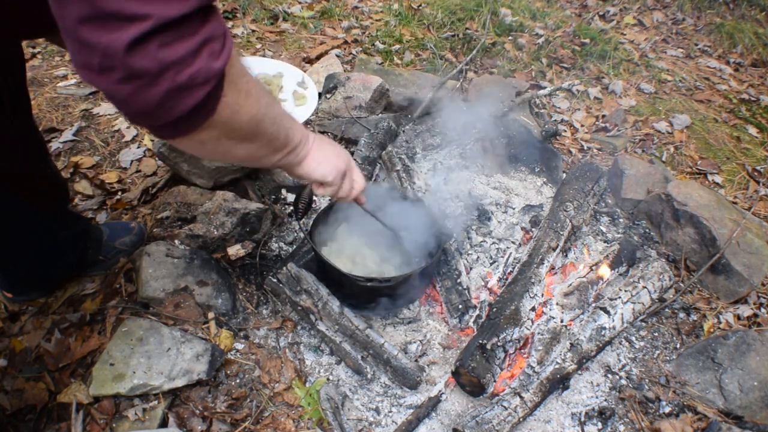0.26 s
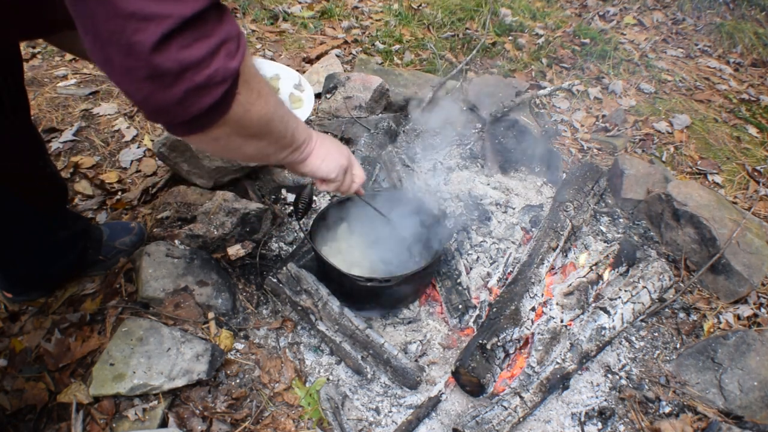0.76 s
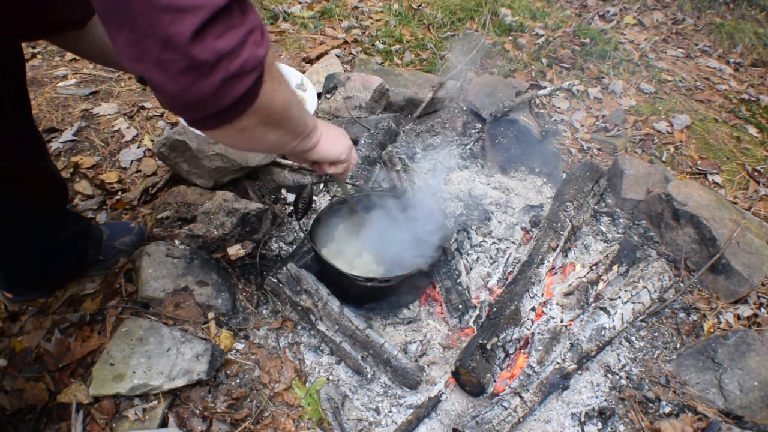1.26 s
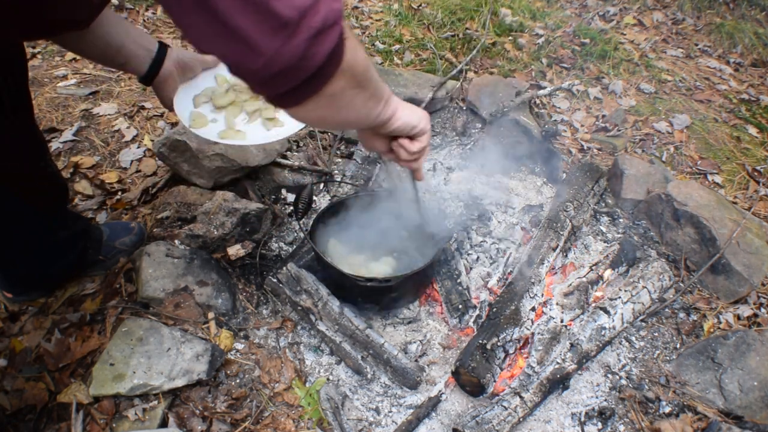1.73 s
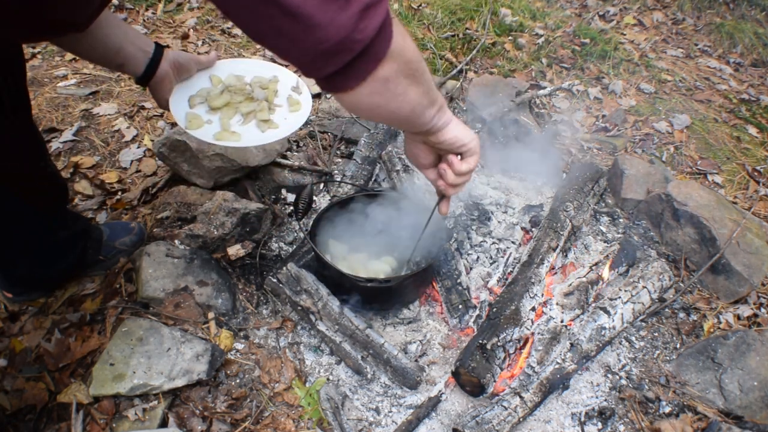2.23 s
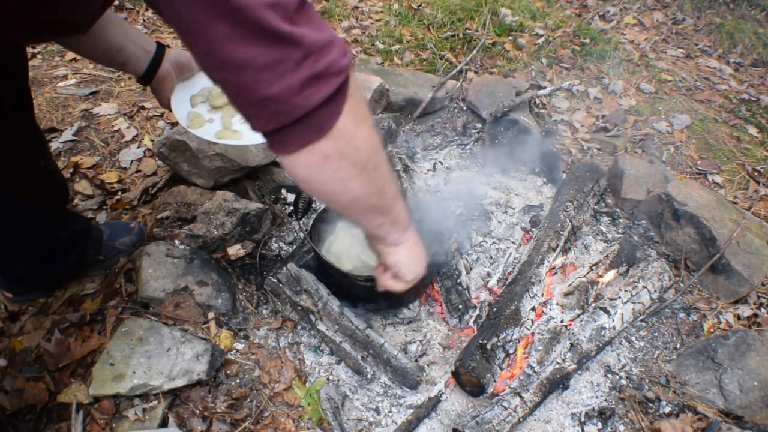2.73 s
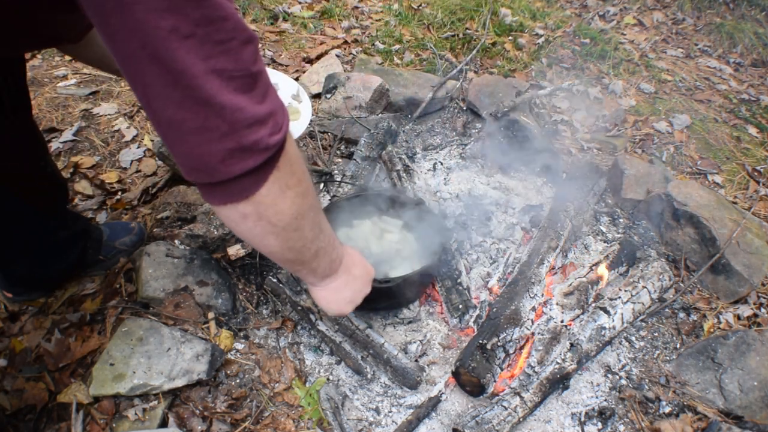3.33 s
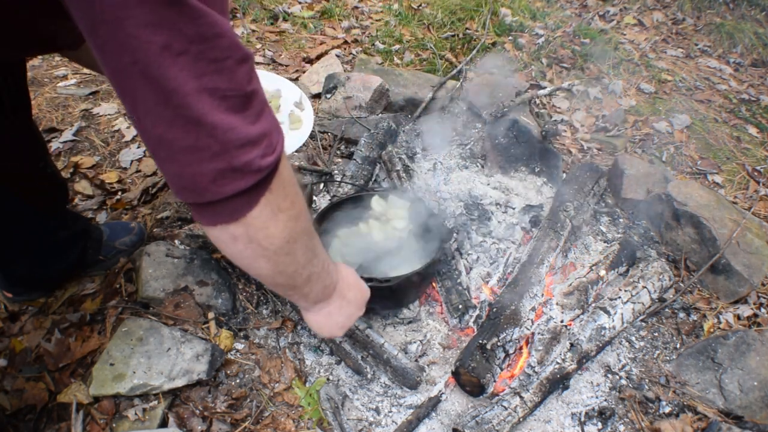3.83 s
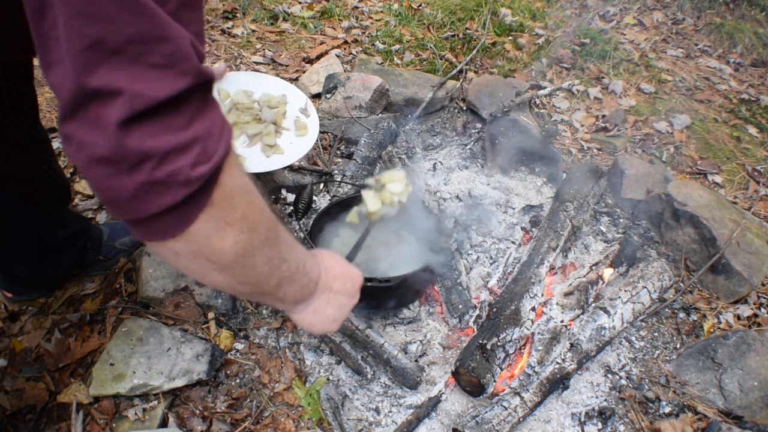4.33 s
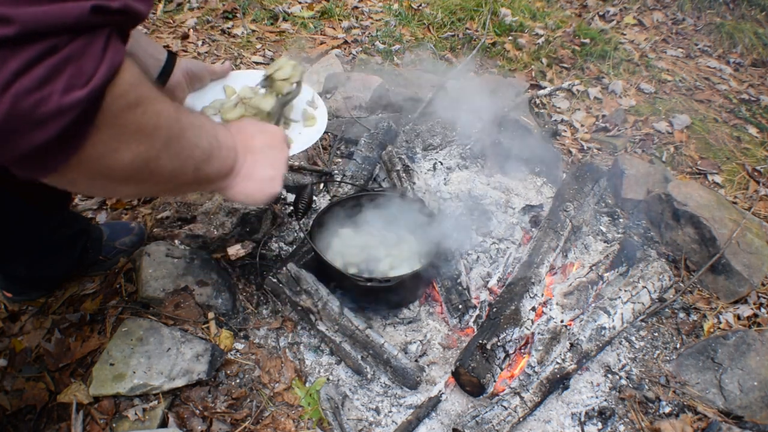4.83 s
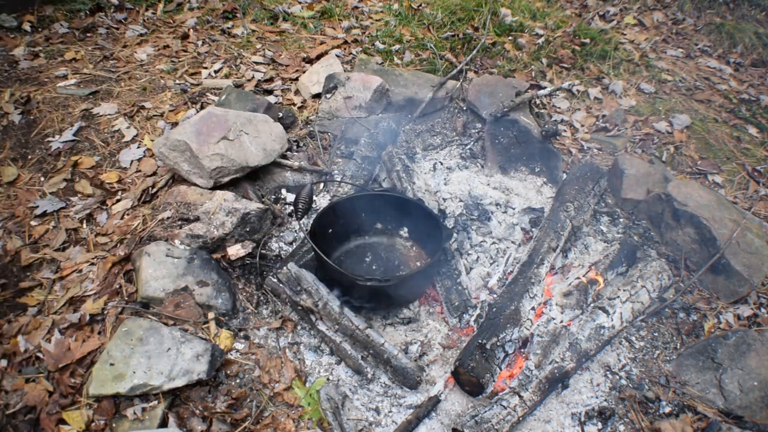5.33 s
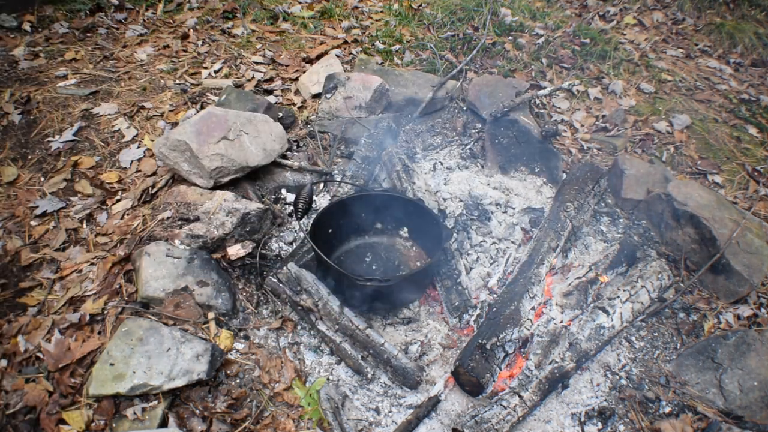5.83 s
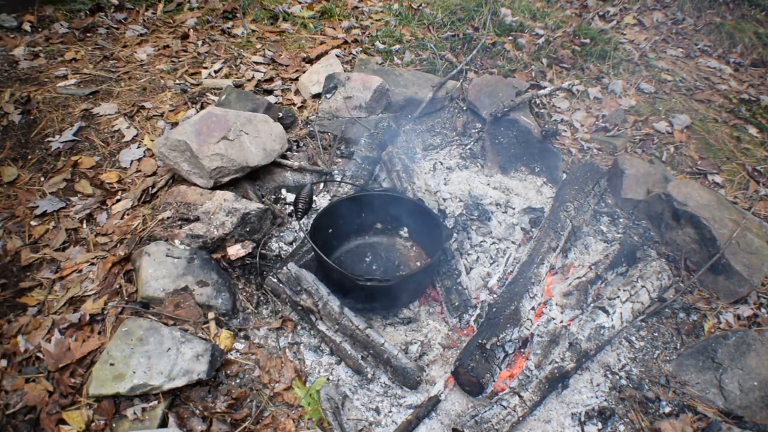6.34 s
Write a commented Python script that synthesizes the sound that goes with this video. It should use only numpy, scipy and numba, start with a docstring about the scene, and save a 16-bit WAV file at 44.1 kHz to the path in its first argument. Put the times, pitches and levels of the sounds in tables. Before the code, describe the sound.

Ringing scrapes and clanks in a cast-iron pot over soft frying sizzle and sharp oil pops, then suddenly quieter air, crunching leaves and a faint insect.

```python
"""Outdoors over coals, a metal spoon knocks and scrapes the floor of a cast-iron pot of sizzling, spitting oil.
Random slips and knocks excite the pot's modes; filtered noise and clicks make the oil, fire and distance.
A sine of gliding pitch is a far engine's drone. At 5.17 s the scene jumps ahead: the oil is silent,
the drone is higher, feet crunch over dry leaves as swelling clouds of filtered clicks, and an insect chirps."""
import sys
import numpy as np
from scipy import signal
from scipy.fft import rfft, irfft, next_fast_len
from scipy.io import wavfile
from scipy.ndimage import uniform_filter1d
from numba import njit

SR = 44100
rng = np.random.default_rng(int(sys.argv[2]) if len(sys.argv) > 2 else 0)


def put_to_file(sound):
    """Save the sound as 16-bit audio at rate SR, in the file named by the first command-line argument."""
    columns = np.atleast_2d(sound).T  # one column per channel
    safe = np.clip(columns, -1, 1)
    whole_steps = np.round(safe * 32767)
    wavfile.write(sys.argv[1], SR, whole_steps.astype(np.int16))


N = 290605
GRID_HZ = 2000  # swells are computed on this coarser time grid
SWELL_DB = 25  # rise and fall times span this many dB

# the spoon lands or catches: start_s, relative level_db, pitch_hz (favoured), place (of contact, 0-1), thud_db
KNOCKS = [(0.022, 3.5, 2367, 0.43, -53), (0.439, 3.5, 2050, 0.3, -41), (0.556, -7.5, 2680, 0.26, -53),
          (0.887, -6.5, 3500, 0.7, -18.5), (1.042, -10.5, 764, 0.26, -45), (1.264, 1, 3900, 0.05, -19),
          (1.312, -10, 3650, 0.23, -49), (1.48, -26, 3230, 0.4, -59), (1.8055, -9, 5350, 0.5, -48),
          (1.885, -8, 3370, 0.27, -43), (1.961, -13, 1355, 0.59, -40), (2, -4, 3150, 0.36, -70),
          (2.156, -15.5, 790, 0, -48), (2.17, -13, 2300, 0.3, -59), (2.909, -21, 1240, 0.99, -45)]
# pushes of the spoon over the iron; a landing skids at once, a drag swells: # top_s (when the level reaches its
# top), rise_s, hold_s, fall_s, level_db, pitch_hz (favoured), place (of contact, 0-1), #
# brightness_db_per_octave, then ring_db, rasp_db and scuff_db against the level, lift_db (at the favoured
# pitch)
SCRAPES = [ (0.027, 0.079, 0.011, 0.022, -8, 2380, 0.51, 0.5, -32.5, -17, -31, 4),
           (0.057, 0.059, 0.018, 0.081, -6, 2900, 0.044, 2, -30, -15, -43, 3),
           (0.103, 0.074, 0.031, 0.035, -13.5, 4600, 0.44, 7, -30.5, -8.5, -55, 8),
           (0.44, 0.0025, 0, 0.01, 2.5, 2020, .3, -4, -32.5, -37, -17, 3),
           (0.511, 0.034, 0.039, 0.04, -7.5, 1820, 0.26, -1.5, -29.5, -15, -40, 2.5),
           (0.887, 0.0011, 0.0032, 0.017, -0.5, 2120, 0.28, -1.5, -29, -13, -50, -0.5),
           (0.968, 0.062, 0.023, 0.071, -2.5, 1970, 0.25, -1.5, -31.5, -14, -49, 4.5),
           (1.031, 0.08, 0.0034, 0.044, -9, 1100, 0.33, 0, -31, -28, -40, 8),
           (1.266, 0.0037, 0, 0.029, -12, 3630, 0.82, 4, -31, 5.5, -43, 15.5),
           (1.328, 0.038, 0, 0.18, -15.5, 3670, 0.73, 0.5, -32.5, -17, -21, -4),
           (1.419, 0.082, .045, 0.035, -7.5, 3260, 0.27, -0.2, -32, -17.5, -28, 3.5),
           (1.805, .0015, 0, 0.036, -11.5, 5130, .59, 7.5, -34.5, 2.5, -24, 19),
           (1.848, 0.026, 0.042, 0.082, -16.5, 3270, 0.375, 1, -30.5, -10.5, -40, 17),
           (1.885, 0.055, 0.012, 0.042, -6, 3240, .45, 1, -31.5, -27, -23.5, -2.5),
           (1.959, 0.0025, 0.0051, 0.042, -14, 1500, 0.215, 0.5, -31, -22, -40, -11),
           (2.002, .05, 0.0079, 0.066, -4.5, 3100, 0.39, 0.5, -31.5, -20, -47, 1.5),
           (2.068, 0.16, 0.016, 0.071, -9.5, 1410, 0.26, -3, -32.5, -29, -30.5, 4),
           (2.161, 0.027, 0.033, 0.13, -9.5, 1486, .3, -3.5, -31.5, -26, -26, 4.5),
           (2.226, 0.045, 0.014, 0.078, -18, 2200, 0.33, -1, -33, -30, -39, 16),
           (2.31, 0.1, 0.0098, 0.16, -6, 2780, 0.28, -3, -33, -24, -31, 6.5),
           (2.377, 0.25, 0.028, 0.1, -11, 2050, 0.24, -2.5, -33.5, -18.5, -38, 1.5),
           (2.517, 0.11, 0.0063, 0.2, -11, 1900, 0.14, -0.7, -33, -21, -20.5, 7.5),
           (2.622, .1, 0.023, 0.11, -24.5, 1750, .3, -0.5, -32, -27, -14, 6),
           (2.69, .08, 0.098, 0.11, -11, 1870, 0.15, -0.2, -34.5, -16, -24.5, 10),
           (2.803, 0.067, 0.035, 0.12, -13, 1570, 0.2, 0.5, -32, -15, -32, 8),
           (2.88, .2, 0.039, 0.021, -21, 1290, 0.24, -3, -35.5, -37, -17, 21.5),
           (3.164, 0.19, .005, 0.14, -25.5, 1300, .23, -2.5, -34, -9, -17, 6), ]


def gain_of(db):
    """Level is logarithmic: 20 dB is a factor of ten in amplitude."""
    return 10 ** (np.asarray(db) / 20)


def evened(x):
    """Normalisation to unit rms gives sources of any kind equal power."""
    return x / np.sqrt(np.mean(x ** 2) + 1e-20)


def played(tables, column, rest):
    rows = []
    for table in tables:
        edge = [] if rest is None else [rest]
        rows += [(table[0][0] - 0.004, value) for value in edge]
        rows += [(row[0], row[column]) for row in table]
        rows += [(table[-1][0] + 0.0024, value) for value in edge]
    s, value = np.transpose(sorted(rows))
    return np.interp(np.arange(N) / SR, s, value)


def coloured(x, spectrum):
    """Spectral filtering: the Fourier components are weighted by a response in dB, then set to rms 1."""
    f, db = np.transpose(spectrum)
    size = next_fast_len(N)
    hz = np.fft.rfftfreq(size, 1 / SR)
    response = gain_of(np.interp(np.log(hz + 1), np.log(f), db, left=-90))
    return evened(irfft(rfft(x, size) * response)[:N])


def grit(per_s, spread_db):
    """Shot noise: random clicks of either sign, a few of them large, rms 1."""
    size = gain_of(spread_db * np.minimum(rng.exponential(1, N), 5))
    sign = rng.choice([-1., 1.], N)
    return evened(size * sign * (rng.random(N) < per_s / SR))


def flutter(per_s, depth_db):
    """Random amplitude modulation by smoothed noise, of rms depth depth_db."""
    span = max(round(SR / per_s), 2)
    smooth = uniform_filter1d(uniform_filter1d(rng.standard_normal(N), span), span)
    return gain_of(depth_db * evened(smooth))


def resonate(x, hz, width):
    """Heterodyne resonance: hz is shifted down to zero, smoothed and shifted back, at gain 1."""
    turn = np.exp(2j * np.pi * np.cumsum(hz * np.ones(len(x))) / SR)
    r = np.exp(-np.pi * width / SR)
    return 2 * (turn * signal.lfilter([1 - r], [1, -r], x / turn)).real


def burst(events, decay_s, width_share, flat_db):
    """Impact noise: a sudden start and exponential decay, rung around each event's centre frequency."""
    out, t = np.zeros(N + 2000), np.arange(1500) / SR
    for (s, db, hz), noise in zip(events, rng.standard_normal((len(events), 1500))):
        puff = noise * np.exp(-t / decay_s)
        rung = resonate(puff, hz, width_share * hz)
        sound = rung / abs(rung).max() + gain_of(flat_db) * puff / abs(puff).max()
        out[round(s * SR):][:1500] += gain_of(db) * sound
    return out[:N]


@njit
def ring(drive, hz, width, sr):
    """A damped mode is a decaying rotating phasor; its decay rate may change in time."""
    out, state, turn = np.zeros(len(drive)), 0j, np.exp(2j * np.pi * hz / sr)
    for n in range(len(drive)):
        state = state * turn * (1 - np.pi * width[n] / sr) + drive[n]
        out[n] = state.imag
    return out


def favour(hz, centre_hz, octaves, db):
    """Selective excitation: a bell-shaped lift over log frequency, in gain."""
    return gain_of(db * np.exp(-(np.log2(hz / centre_hz) / octaves) ** 2))


def swells(rows):
    """Exponential envelopes are straight in dB: each row rises, holds and falls, in dB below its top."""
    t = np.arange(0, N / SR, 1 / GRID_HZ)
    s, rise, hold, fall = np.transpose([row[:4] for row in rows])[:, :, None]
    before, after = np.maximum(s - t, 0), np.maximum(t - s - hold, 0)
    return -SWELL_DB * (before / rise + after / fall)


def fine(x):
    """Linear interpolation from the coarse grid to samples."""
    return np.interp(np.arange(N) / SR, np.arange(len(x)) / GRID_HZ, x)


def summed_db(shape_db, top_db):
    """Powers of incoherent sources add: the level of all swells together."""
    power = (gain_of(shape_db + np.c_[top_db]) ** 2).sum(0)
    return fine(10 * np.log10(power + 1e-10))


def leading(shape_db, top_db, value):
    """Power-weighted mean: the loudest swell dominates a value given per row."""
    db = shape_db + np.c_[top_db]
    share = gain_of(db - db.max(0)) ** 2
    return fine((share * np.c_[value]).sum(0) / share.sum(0))


def sizzle():
    """Bubble noise: dense tiny bubbles seethe as near-steady noise, larger ones crackle as sparse clicks."""
    # start_s, crackle_db, seethe_db
    levels = [(0, -43, -41.5), (.75, -49.5, -40.5), (1.7, -45.5, -44.5), (2.2, -38.5, -38), (3.0, -41, -33),
              (3.3, -46.5, -37), (3.6, -37, -38), (3.9, -44, -41.5), (4.07, -42, -39.5), (4.4, -41.5, -41),
              (4.9, -45, -43), (5.16, -44, -40.5)]
    # colour of the seethe: frequency_hz, relative level_db per Hz
    fizz = [(1060, -43), (1800, -44), (1910, -1.5), (2730, 2), (5500, 1), (7300, -10), (9000, -11),
            (14000, -13), (16500, -43)]
    seethe = rng.standard_normal(N) * flutter(40, 1.4) + 0.4 * grit(1500, 7.0)
    crackle = rng.standard_normal(N) + 1.4 * grit(2100, 4.8) + 0.7 * grit(80, 6.5)
    crackle = coloured(crackle, [(3000, 3), (7500, 0.5), (11000, 4), (16500, 0.5)])
    out = gain_of(played([levels], column=2, rest=-90)) * coloured(seethe, fizz)
    return out + gain_of(played([levels], column=1, rest=-90)) * crackle


def wash():
    """Broadband noise: fire and far traffic merge into a soft, nearly steady wash."""
    # frequency_hz, relative level_db per Hz
    air = [(15, -63), (25, -20), (65, -12), (245, -12.5), (470, -8.5), (600, -9.5), (706, -7), (1220, -7),
           (2150, -16), (3600, -16), (5130, -26), (14400, -33), (16500, -50)]
    return gain_of(-38) * coloured(rng.standard_normal(N), air) * flutter(45, 0.3)


def engine():
    """Frequency integrates to phase: a low sine drone follows a gliding pitch."""
    # one list per scene: start_s, pitch_hz, level_db (rms)
    drone = [
        [(0.0, 57.6, -62), (0.2, 57.4, -50), (1.02, 57.2, -44), (2.3, 58, -46), (2.45, 59.5, -45),
         (3.24, 59.5, -45), (5.17, 61.5, -47)],
        [(5.2, 67.4, -48), (6.49, 68.3, -43.5), (6.59, 73, -51)],
    ]
    turns = np.cumsum(played(drone, column=1, rest=None)) / SR
    level = np.sqrt(2) * gain_of(played(drone, column=2, rest=None))
    return level * np.sin(2 * np.pi * turns) * flutter(1.5, 1.0)


def pot_modes(slips, shape, level_db):
    """Modal excitation: slips and knocks ring one set of modes, damped by contact, freely once the spoon lifts."""
    # modes of pot and spoon: frequency_hz
    mode_hz = [571, 651, 772, 1031, 1240, 1410, 1706, 1860, 2253, 2643, 2715, 3238, 3325, 3549, 3685, 3802,
               3887, 4083, 4655, 4737, 5030, 5351, 5748, 6090, 6350, 6820]
    # the same modes: width_hz (before the damping factor), relative level_db
    iron = [(0.79, -30), (1.18, -33.5), (20.4, -1.5), (9.7, -7), (39, 1.5), (17.2, -2.5), (10, -9.5),
            (11.9, -14), (17.4, 2), (7, -18.5), (14.2, -4.5), (8.7, -2), (10.5, -0.5), (6, -9.5),
            (22.9, -2.5), (8.7, -11), (12, -26), (8.2, -9), (14, -5.5), (13, -6), (19, -9.5), (13.3, -4.5),
            (16, -11), (27, -5.5), (32, -8), (40, -7)]
    block = 64  # slow weights are held for this many samples
    end = block * 2480
    light_tilt = 0.05  # a lighter touch is brighter: dB per octave for each dB below the top
    press, lift_off_db = 0.85, -34.5  # width factor gained over the 10 dB above the lift-off level
    top_db, *colour, _, _, lift = np.transpose(SCRAPES)[4:]
    centre, place, bright, ring_db, lift_db, touch_db = (
        leading(shape, top_db, v)[:end] for v in (*colour, lift, top_db))
    tilt = bright + light_tilt * np.clip(touch_db - level_db[:end], 0, SWELL_DB)
    damping = 1.5 + press * np.clip((level_db[:end] - lift_off_db) / 10, 0, 1)
    s, knock_db, knock_hz, knock_place, _ = np.transpose(KNOCKS)
    at, out = np.round(s * SR).astype(int), np.zeros(N)
    for k, (hz, (width, db)) in enumerate(zip(mode_hz, iron)):
        # a mode is weak where the contact sits near one of its still lines
        reach = 0.22 + abs(np.cos(np.pi * (k + 2) * place[::block]))
        weight = reach * favour(hz, centre[::block], 0.45, db=lift_db[::block])
        weight = weight * gain_of(ring_db[::block] + tilt[::block] * np.log2(hz / 2500))
        drive = slips[:end] * np.repeat(weight, block)
        knock = gain_of(knock_db - 17) * favour(hz, knock_hz, 0.13, db=24.5)
        drive[at] += knock * np.cos(np.pi * (k + 2) * knock_place)
        out[:end] += (-1) ** k * gain_of(db) * ring(drive, float(hz), width * damping, SR)
    # the dull contact noise also favours the leading push's pitch
    grind = slips * 1.
    grind[:end] += gain_of(lift_db + 15) * resonate(slips[:end], centre, 650)
    return out + grinding(grind, slips)


def grinding(grind, slips):
    """Friction noise: the dull part of the contact noise, at a power tied to the slips."""
    # frequency_hz, relative level_db per Hz
    dull = [(640, -50), (780, -6), (1400, 13), (3500, 21), (6500, 16), (8000, -76)]
    return gain_of(-9.5) * coloured(grind, dull) * np.sqrt(np.mean(slips ** 2))


def rasping(rough, shape):
    """Resonant friction: broad resonances colour the bright rasp of the rough contact."""
    # broad resonances: frequency_hz, width_hz, relative level_db
    resonances = [(7550, 90, -2), (8010, 61, 6.5), (8930, 120, 2.5), (9600, 45, -4), (11160, 38, -21),
                  (11800, 160, 6.5), (13300, 110, 17)]
    # treble of the rasp: frequency_hz, relative level_db per Hz
    treble = [(5500, 17), (7000, -1.5), (8400, -12), (10500, 5), (13500, -25), (16500, -1.5)]
    steepness = 0.98  # dB of rasp per dB of swell
    rows = np.transpose(SCRAPES)
    rasp = rough * flutter(120, 0.77)
    resonant = sum(gain_of(db) * evened(resonate(rasp, hz, width)) for hz, width, db in resonances)
    rasp = gain_of(-3) * rasp + resonant
    return coloured(rasp, treble) * gain_of(summed_db(steepness * shape, rows[4] + rows[9]))


def spoon():
    """Stick-slip friction and impact: slips on rough iron and knocks drive rings, rasp, scuffs and thuds."""
    rough = grit(3500, 3.68) * flutter(80, 0.99)
    shape, rows = swells(SCRAPES), np.transpose(SCRAPES)
    level_db = summed_db(shape, rows[4])
    slips = rough * gain_of(level_db)
    out = pot_modes(slips, shape, level_db) + rasping(rough, shape)
    out += gain_of(3) * burst([row[:3] for row in KNOCKS], 0.0024, 1.0, flat_db=-69.5)
    out = signal.lfilter(*signal.butter(4, 560, "high", fs=SR), out)  # the rings radiate little bass
    # the whole pot shifts on the coals
    scuff = coloured(rough, [(120, -34), (240, 1.5), (340, -14), (500, 7.5), (700, -24.5)])
    scuff *= gain_of(summed_db(shape, rows[4] + rows[10]))
    thuds = burst([(row[0], row[4], 300) for row in KNOCKS], 0.0039, 0.42, flat_db=-30)
    return out + scuff + thuds


def spits():
    """Transient excitation: the largest bubbles burst as short rung noise with a low plop."""
    # start_s, level_db (of the resonant part's peak), centre_hz, plop_db
    drops = [(0.6356, -22.5, 3260, -60), (0.7894, -27, 3500, -71), (1.1763, -29, 3600, -41),
             (1.6677, -28.5, 5710, -30), (1.7729, -24, 3310, -37), (3.0255, -15.5, 4750, -27),
             (3.045, -18, 3120, -52), (3.0974, -14, 5440, -31), (3.302, -6.5, 4800, -55),
             (3.43, -27, 5880, -40), (3.701, -31, 3430, -41), (3.761, -26, 3680, -38),
             (3.7946, -20.5, 5290, -45), (3.8302, -24, 5710, -52), (4.153, -12, 3000, -19.5),
             (4.2124, -32, 5660, -44), (4.4109, -35, 3060, -53), (4.798, -30, 5630, -45),
             (5.007, -21.5, 3800, -49)]
    plops = burst([(s, plop_db, 280) for s, _, _, plop_db in drops], 0.0027, 0.96, flat_db=-30)
    return plops + burst([row[:3] for row in drops], 0.0013, 0.24, flat_db=-1.5)


def feet():
    """Granular crushing: leaves and gravel break in clumps of clicks, filtered around each step's centre."""
    # weight coming down on leaves: top_s (when the swell reaches its top), rise_s, hold_s, fall_s, crunch_db,
    # centre_hz (crunch), rustle_db
    steps = [(5.38, 0.025, 0.012, 0.12, -30.5, 920, -50), (5.41, 0.024, .005, .05, -22, 980, -36),
             (5.437, 0.026, 0.0024, 0.024, -14, 2320, -34), (5.454, 0.031, 0.016, 0.043, -14, 1470, -39),
             (5.49, 0.087, 0, 0.091, -20, 814, -45), (5.569, 0.14, 0.011, 0.11, -32, 1000, -35.5),
             (5.848, 0.021, 0.018, 0.084, -41, 1150, -38), (5.93, 0.0067, 0.0029, 0.042, -83, 880, -36.5),
             (6.049, 0.0091, 0.25, 0.018, -42, 1000, -37), (6.112, 0.07, 0.025, 0.1, -28.5, 980, -35.5),
             (6.218, 0.044, 0.01, 0.094, -28.5, 710, -34.5), (6.394, .025, 0, 0.028, -29.5, 1260, -34),
             (6.44, 0.014, 0.015, 0.025, -27.5, 930, -39), (6.561, 0.007, 0, 0.049, -31, 560, -29)]
    # twigs and stones under the feet: start_s, level_db (of the resonant part's peak), centre_hz
    snaps = [(5.178, -31, 298), (5.372, -23, 980), (5.519, -20, 966), (5.553, -44, 1010),
             (5.843, -28, 1100), (5.93, -43, 1080), (5.998, -32, 593), (6.053, -34, 1420),
             (6.221, -14.5, 523), (6.254, -25, 1100), (6.3, -24, 1180), (6.392, -41, 1140),
             (6.434, -16, 2600), (6.449, -42, 869), (6.556, -22, 363)]
    leaf_steepness, rustle_hz = 0.64, 3240  # dB of rustle per dB of swell; its centre in Hz
    start = round(5.3 * SR)  # crunch and rustle begin here
    grains = (grit(2500, 1.9) * flutter(49, 3.9))[start:]
    shape, (top_db, top_hz, leaf_db) = swells(steps), np.transpose(steps)[4:]
    crunch_db = summed_db(shape, top_db)[start:]
    centre = leading(shape, top_db, top_hz)[start:]
    rustle_db = summed_db(leaf_steepness * shape, leaf_db)[start:]
    low = evened(resonate(resonate(grains, 980, 630), 380, 400))
    body = evened(resonate(resonate(grains, centre, 1460), centre, 1400))
    crunch = evened(body + 0.59 * low)
    leaves = grit(4000, 2.9) * flutter(69, 1.5)
    papery = coloured(leaves, [(2000, -4), (5500, -5.5), (8000, -13.5), (16000, -14.0)])[start:]
    dry_leaf = evened(resonate(resonate(leaves[start:], rustle_hz, 1300), rustle_hz, 1300))
    rustle = evened(dry_leaf + 2.1 * papery)
    out = burst(snaps, 0.0038, 0.21, flat_db=-28)
    out[start:] += crunch * gain_of(crunch_db) + rustle * gain_of(rustle_db)
    return out


def insect():
    """Narrow-band noise sounds as one thin, wavering tone, swelling into chirps."""
    # top_s (when the swell reaches its top), rise_s, hold_s, fall_s, level_db
    chirps = [(5.24, .03, .3, 0.046, -53), (5.623, .03, .005, 0.55, -45)]
    tone = evened(resonate(rng.standard_normal(N), 3555, 25))
    return tone * gain_of(summed_db(swells(chirps), np.transpose(chirps)[4]))


def scene():
    """Superposition: the pressures of all sources add at one microphone."""
    return (sizzle() + wash() + engine() + spoon() + spits() + feet() + insect())[None]


def record(dry):
    """Dynamic compression ducks loud passages; saturation clips peaks softly; a low-pass limits the band."""
    power_db = 10 * np.log10(abs(uniform_filter1d(dry[0] ** 2, 400)) + 1e-12)
    fall = np.arange(N) * 60. / SR  # recovers 60 dB a second
    held_db = np.maximum.accumulate(power_db + fall) - fall
    over_db = np.maximum(held_db + 21, 0)  # threshold at -21 dB
    ducked = np.tanh(dry / gain_of(0.26 * uniform_filter1d(over_db, 200)))
    low_pass = signal.firwin(255, 15900, window=("kaiser", 5), fs=SR)
    return signal.oaconvolve(ducked, low_pass[None], "same")


dry = scene()
out = record(dry)
put_to_file(out)
```